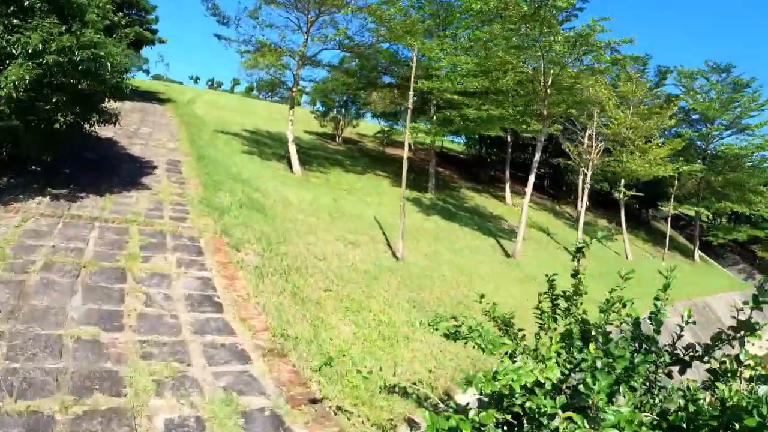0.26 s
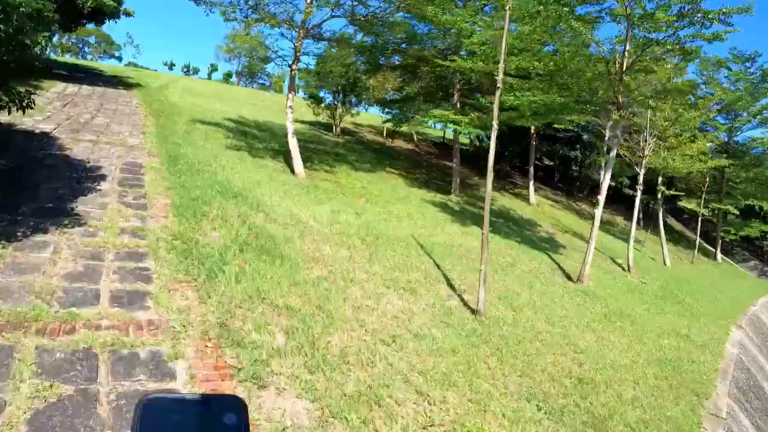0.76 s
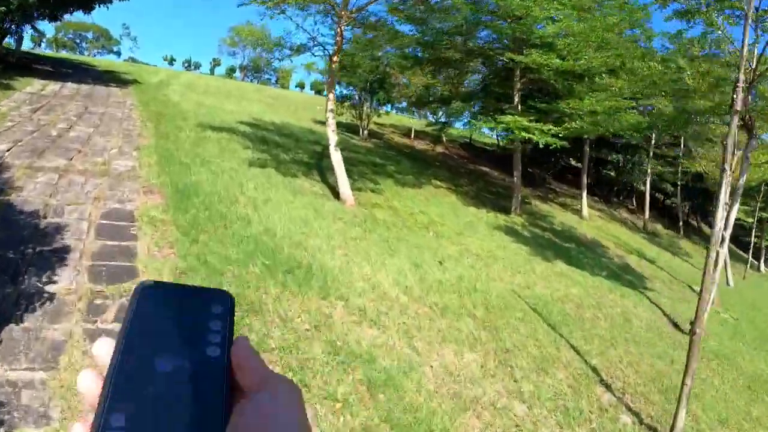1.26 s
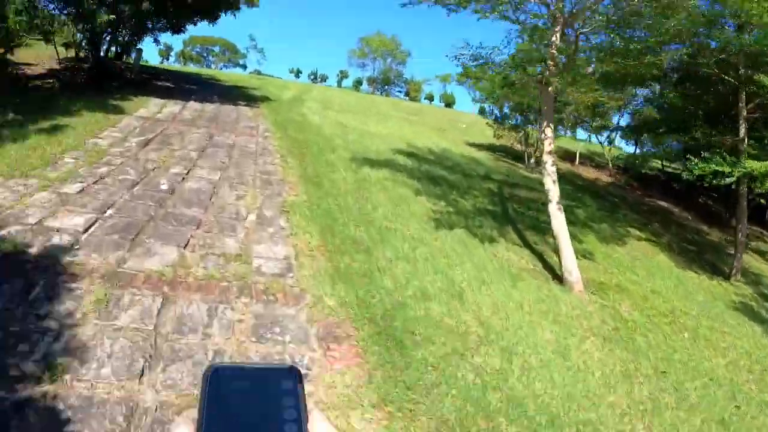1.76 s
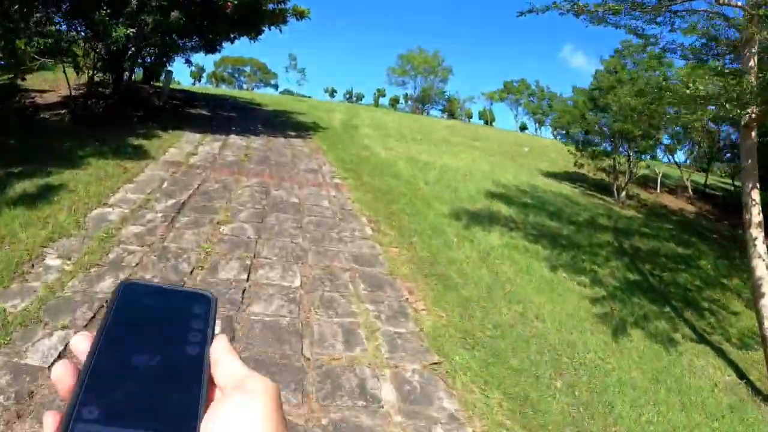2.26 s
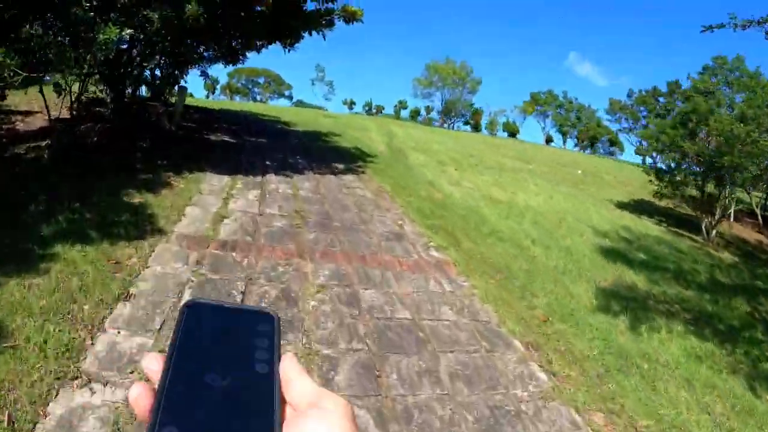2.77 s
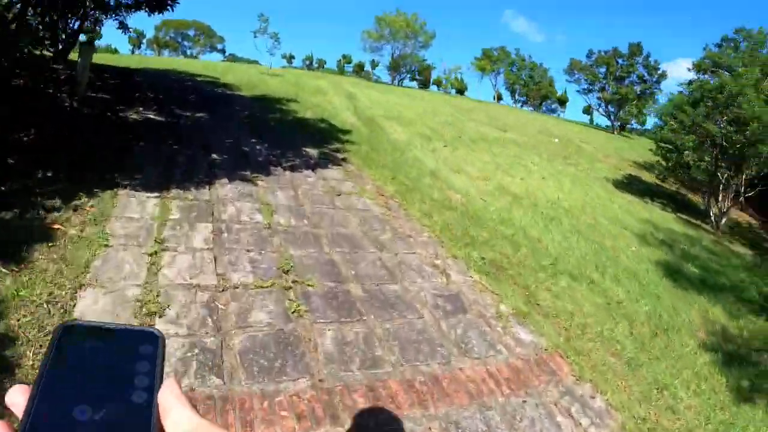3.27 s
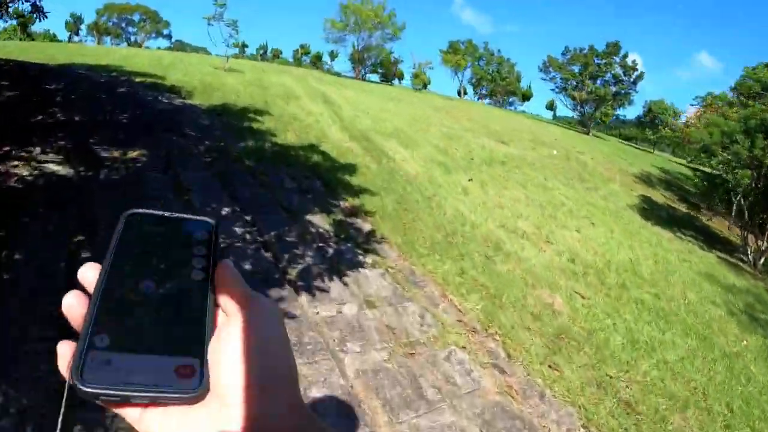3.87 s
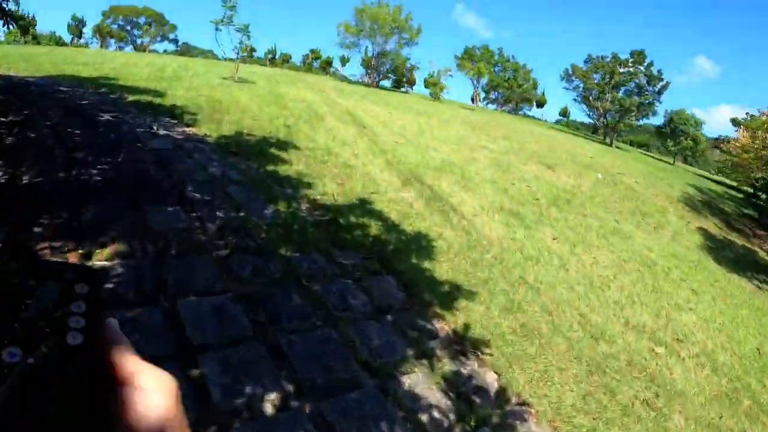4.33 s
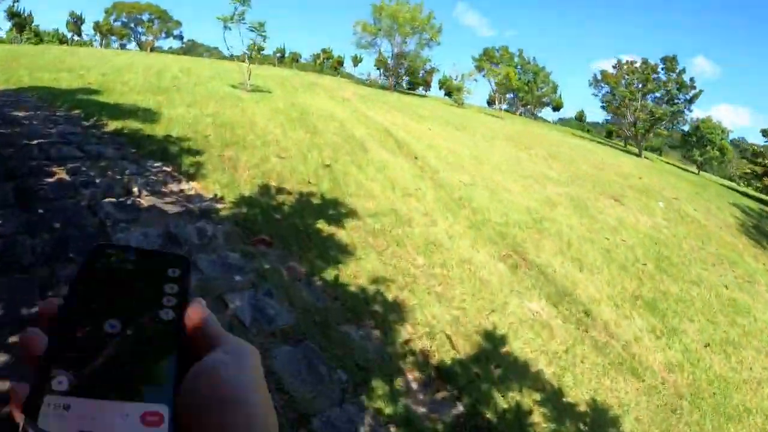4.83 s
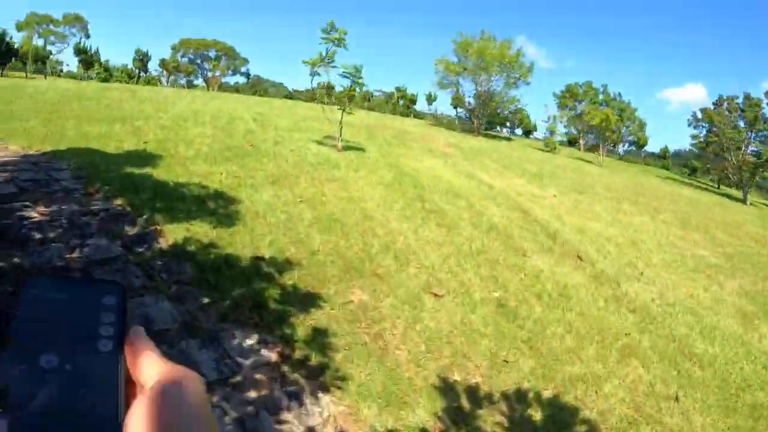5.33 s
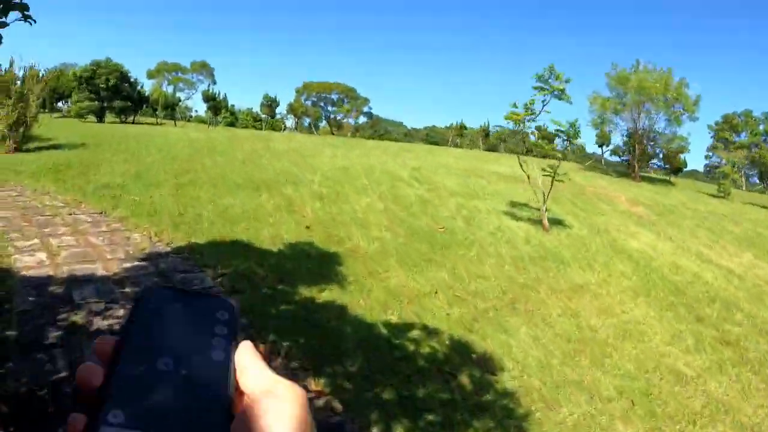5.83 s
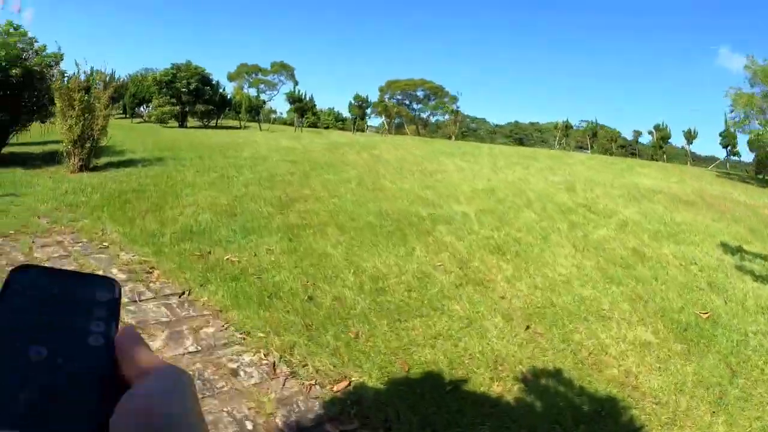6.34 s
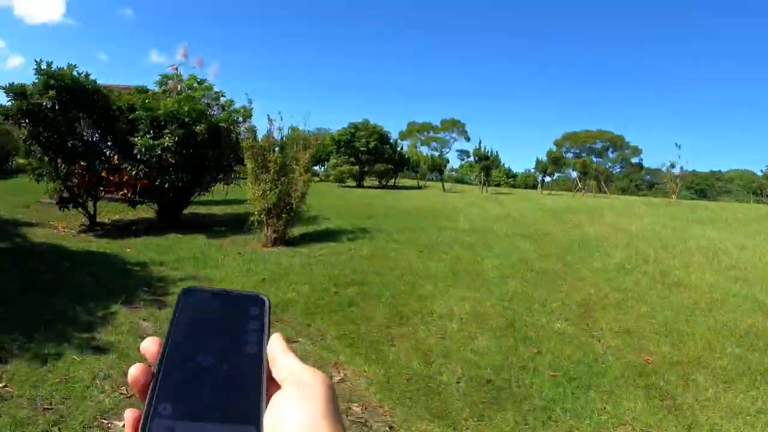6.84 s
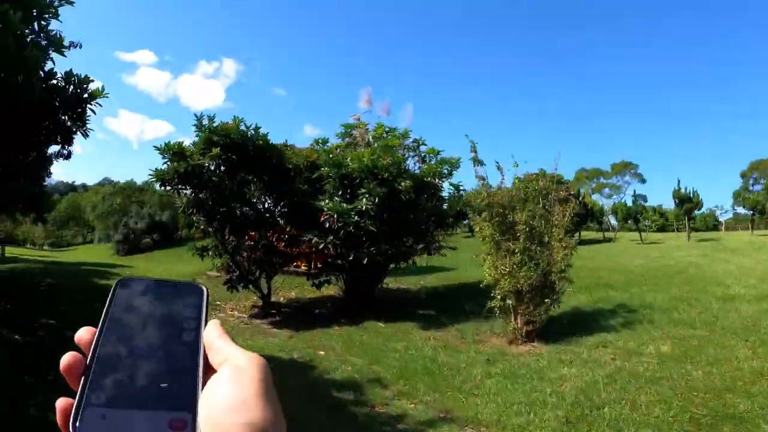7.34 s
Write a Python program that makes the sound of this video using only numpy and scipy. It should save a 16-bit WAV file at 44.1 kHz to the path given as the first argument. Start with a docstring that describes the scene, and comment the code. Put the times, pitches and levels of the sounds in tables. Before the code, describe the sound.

Close handling noise on an outdoor climb: hard plastic knocks, dull bumps, scratchy fabric rubbing and thin grassy crackles, growing strongest near the end.

```python
"""Camera on a grassy climb

A walker climbs a grassy slope with a small camera strapped on. Its plastic shell knocks and bumps in the
mount (struck modes, soft low cycles), cloth rubs past the two microphone ports, mostly the right one
(coloured random clicks), and grass hisses and crunches (finer, brighter clicks).
The camera first sends the left port to both channels, then fades to stereo."""
import sys
import numpy as np
from scipy import signal
from scipy.fft import rfft, irfft
from scipy.io import wavfile

SR = 44100
rng = np.random.default_rng(int(sys.argv[2]) if len(sys.argv) > 2 else 0)


def volts_from_decibels(level):
    """Turn decibel levels (scalar or array-like) into linear amplitude factors."""
    exponent = np.asarray(level, float) / 20
    return 10 ** exponent


def log_audio(samples):
    """Write samples as a 16-bit WAV file to the path given in sys.argv[1]."""
    # one column per channel
    frames = np.atleast_2d(samples).T
    # limit to full scale, then quantise
    limited = np.clip(frames, -1, 1)
    pcm = np.round(limited * 32767).astype(np.int16)
    wavfile.write(sys.argv[1], SR, pcm)


N = 335160    # samples, 7.6 s


def scene():
    """Shell, cloth and grass as they reach the left and right ports."""
    return knocks() + bumps() + cloth() + grass()


# Knocks of the shell, levels before the plastic damps the top. Each row: start in seconds, ring peak in dB
# at the right port, left minus right in dB, clack peak in dB, tick peak in dB.
KNOCKS = [(0.0036, -57, 4.5, -47.5, -35), (0.025, -66, -2, -48, -83), (0.0943, -63, 0, -63, -78),
          (0.157, -54.5, 4, -49, -38.5), (0.1837, -61, 1, -56, -62), (0.257, -52, -5, -37, -59),
          (0.2758, -49, 0.5, -46, -43.5), (0.307, -59, 2, -53, -37), (0.4061, -63, -5, -52, -78),
          (0.4239, -64, -1, -56, -70), (0.4709, -51.5, -2, -44.5, -39.5), (0.5418, -53, 0, -48, -50.5),
          (0.5876, -47.5, -4.5, -44, -47.5), (0.6117, -66, -3, -66, -52), (0.653, -76, -8, -48.5, -52),
          (0.7226, -76, -7, -72, -76), (0.781, -61, -3, -49, -42.5), (0.8203, -71, 0.5, -52, -76),
          (0.9232, -79, 5, -55, -44.5), (0.9498, -74, -4.5, -51, -60), (1.018, -82, -7, -86, -67),
          (1.0868, -55, -1, -52, -54), (1.134, -65, 0, -43, -61), (1.2015, -58, -3, -52.5, -63),
          (1.2653, -81, 0, -62, -61), (1.3558, -53.5, 3, -51, -41), (1.405, -50.5, 1, -46, -56),
          (1.5163, -56, 2, -57, -67), (1.5628, -64, -8, -63, -74), (1.5844, -70, -7, -61, -63),
          (1.717, -57, 3.5, -49, -40), (1.7907, -53.5, 0.5, -58, -67), (1.8449, -70, -5, -56, -48.5),
          (1.8563, -66, -5, -52, -59), (1.8728, -65, 0, -53, -59), (1.954, -52, 0, -59, -65),
          (2.0163, -64.5, 8, -49.5, -69), (2.1147, -60, 0, -59, -75), (2.1778, -33.5, -43, -49, -58),
          (2.2079, -44, -31, -38, -51), (2.2774, -57, 5, -46.5, -70), (2.3534, -18.5, -33, -22.5, -22.5),
          (2.3893, -53, -17, -30, -51), (2.453, -39, -7.5, -38, -53), (2.4729, -10, -40, -14.5, -19.5),
          (2.4952, -26, -45, -50, -66), (2.5258, -40, -19, -35, -50), (2.5516, -19.5, -49, -23.5, -35),
          (2.602, -37.5, 2.5, -34.5, -64), (2.6734, -15, -37, -19.5, -21.5), (2.761, -46, -1, -35, -63),
          (2.7812, -9.5, -39, -12.5, -18.5), (2.8064, -24, -46, -40, -77), (2.8625, -25.5, -41, -59, -62),
          (2.9322, -36.5, 3, -28, -55), (2.9637, -38.5, -27, -42, -60), (2.9968, -47, -25, -46, -60),
          (3.086, -47, 0, -53, -59), (3.1235, -37.5, -0.5, -41, -53), (3.1657, -58, 2, -43, -61),
          (3.1805, -31.5, -28, -29, -43), (3.2337, -35.5, -27, -44, -68), (3.255, -30, -0.5, -35.5, -31.5),
          (3.3263, -37, -5, -31, -40), (3.3959, -39.5, -25, -33, -63), (3.4473, -17.5, -41, -24, -40.5),
          (3.4715, -25, -46, -39, -45), (3.5145, -32, -29, -44, -60), (3.5298, -26, -42, -35, -45),
          (3.561, -39, -34, -43, -63), (3.5797, -38, 2, -43, -52), (3.6766, -46, -3, -56, -37.5),
          (3.7442, -33, 2, -39, -53), (3.8407, -45.5, -13, -33.5, -45), (3.9213, -31, 2.5, -40, -55),
          (3.9932, -17.5, -27, -20, -22), (4.025, -32, -22, -19, -36), (4.0867, -38, -1, -40, -49),
          (4.269, -42.5, 0.5, -43, -57), (4.314, -33, -29, -37, -49), (4.3363, -34, -24, -22.5, -55),
          (4.3652, -35.5, -34, -61, -67), (4.4484, -40.5, 0, -31, -66), (4.472, -58, -17, -27, -60),
          (4.538, -46, -18, -32, -45), (4.624, -33.5, 2.5, -25.5, -34), (4.7125, -59, -8, -38, -47),
          (4.7879, -29.5, 1.5, -36, -55), (4.8087, -58, -6, -33.5, -53), (4.853, -34.5, -26, -26.5, -52),
          (4.873, -59, -4, -34, -41), (4.9049, -27.5, -39, -41, -62), (4.955, -31.5, 2.5, -31.5, -49),
          (4.9666, -53, -0.5, -47, -45), (5.0266, -22, -43, -26.5, -35), (5.0561, -40.5, -30, -37, -54),
          (5.1054, -33.5, -1, -33, -48), (5.1346, -50, -6, -43, -52), (5.176, -27, -28, -38, -60),
          (5.183, -27.5, -32, -43, -61), (5.1999, -38.5, -29, -33, -43.5), (5.2749, -32, 3.5, -38, -47),
          (5.3502, -18, -48, -47, -44), (5.408, -51, -25, -26.5, -62), (5.4368, -33.5, 1, -33.5, -47),
          (5.4643, -33, -33, -28.5, -50), (5.4874, -27, -43, -46, -58), (5.504, -54, -20, -31, -52),
          (5.54, -35.5, -38, -61, -57), (5.6094, -48.5, 3, -51, -74), (5.6288, -54, -8, -43, -41),
          (5.69, -16, -39, -19.5, -20.5), (5.7042, -66, -1, -40, -67), (5.778, -36, 3, -44, -66),
          (5.8069, -24, -38, -30.5, -49), (5.8401, -26, -34, -38, -55), (5.8532, -28.5, -35, -24.5, -55),
          (5.8672, -40, -6, -37, -51), (5.9544, -33, 4, -31, -56), (6.0262, -17, -53, -25.5, -46),
          (6.108, -41, -1, -44, -58), (6.2044, -30, -36, -42, -61), (6.227, -34, -37, -50, -73),
          (6.2743, -38, -10, -35, -62), (6.322, -25.5, -1, -36, -68), (6.327, -33, -0.5, -38, -48),
          (6.3528, -22.5, -37, -39, -63), (6.3971, -37.5, -24, -42, -59), (6.4405, -55, 0, -40, -56),
          (6.4652, -10, -39, -13, -19), (6.5025, -26, -39, -48, -64), (6.5175, -31, -31, -47, -62),
          (6.5315, -38.5, -19, -30, -48), (6.683, -16, -51, -24.5, -37), (6.734, -32, -24, -45, -62),
          (6.7917, -34.5, -17, -37, -61), (6.8365, -18.5, -30, -23, -31), (6.8617, -27, -30, -37, -52),
          (6.9752, -46, -6, -37, -55), (6.9897, -34.5, -19, -37, -48), (7.0169, -14.5, -44, -21, -35.5),
          (7.0373, -39, -2, -36, -51), (7.101, -54, -1, -41, -49), (7.1262, -11, -26, -11.5, -15.5),
          (7.1605, -19, -47, -30, -39), (7.2045, -21, -43, -50, -45), (7.2673, -24, -16, -34, -47),
          (7.2758, -10.5, -38, -19, -27.5), (7.328, -11, -40, -13.5, -16.5), (7.3412, -35, -30, -34, -69),
          (7.43, -50, -2, -39, -37), (7.442, -8, -35, -15, -18), (7.449, -24, -38, -43, -47),
          (7.476, -17, -41, -38, -38.5), (7.5284, -39.5, -30, -56, -67), (7.5604, -30.5, -20, -24.5, -43),
          (7.5958, -35, -21, -22.5, -43)]
# Modes of the struck shell, in three groups: ring, clack and tick, before each strike's scatter.
# Each row: frequency in Hz, strength in dB, decay by 60 dB in seconds.
RING_MODES = [(696, -6.5, 0.014), (797.4, -8.5, 0.017), (921, -0.5, 0.013), (1074, -4.5, 0.011),
              (1290, 8.5, 0.0057), (1622, 10.5, 0.0068), (1805, -7, 0.0097)]
CLACK_MODES = [(2180, 13.5, 0.0025), (2593, -3.5, 0.02), (3200, -1.5, 0.0044), (3745, -4.5, 0.0051)]
TICK_MODES = [(4280, -17.5, 0.018), (5050, -1, 0.012), (5456, 1, 0.016), (6260, 4, 0.0095),
              (6820, 2.5, 0.0063), (6800, -26, 0.0011), (8620, -2, 0.0066), (9710, 0, 0.0075)]


def knocks():
    """Struck shell modes; the left port hears less of a right-side knock, the treble least weakened."""
    jolt_hz, side_knock_hz, rise_hz_per_db = 1140, 1098, 8.5
    pitch_scatter_octaves, side_full_db, shell_cut_hz = 0.18, -8.5, 7250
    left_lead_s = 0.00023    # most that a right-side knock leads at the left port, through the shell
    s, ring_db, side_db, clack_db, tick_db = np.transpose(KNOCKS)[:, :, None]
    on_side = np.clip(side_db / side_full_db, 0, 1)    # 0 is a jolt in the mount, 1 a right-side knock
    # a jolt favours higher modes; a side knock rings lower, rising with its strength
    side_hz = side_knock_hz + rise_hz_per_db * ring_db
    spot_hz = (1 - on_side) * jolt_hz + on_side * side_hz
    scatter = pitch_scatter_octaves * (1 - 0.69 * on_side)    # jolts scatter most
    spot_hz = spot_hz * 2 ** (scatter * rng.standard_normal(spot_hz.shape))
    favour_db = (10.5 + 13.5 * on_side)[..., None, None]

    ring = volts_from_decibels(ring_db) * struck(RING_MODES, spot_hz, 0.001582, 0.0049, favour_db)
    clack = volts_from_decibels(clack_db) * struck(CLACK_MODES, spot_hz, 0.002643, 0.00026)
    tick = volts_from_decibels(tick_db) * struck(TICK_MODES, spot_hz, 0.0027, 0.00009)
    right = ring + clack + tick
    left = ring * volts_from_decibels(side_db) + clack * volts_from_decibels(0.4 * side_db) + tick * volts_from_decibels(0.25 * side_db)

    lead = left_lead_s * np.clip(-side_db / 3.1, 0, 1)
    out = np.zeros((2, N + 2400))
    for k in range(len(KNOCKS)):
        early = int(max(s[k, 0] - lead[k, 0], 0) * SR)
        late = int(s[k, 0] * SR)
        out[0, early:early + 2400] += left[k]
        out[1, late:late + 2400] += right[k]
    damping = signal.butter(4, shell_cut_hz, fs=SR, output="sos")    # plastic damps the top
    return signal.sosfilt(damping, out[:, :N])


def struck(modes, spot_hz, contact_s, rise_s, favour_db=0):
    """Per knock, every mode is struck twice within the contact, with its own strength; peak 1."""
    hz, db, t60 = np.transpose(modes)[:, None, :, None, None]
    chance = rng.random((len(spot_hz), len(modes), 2, 3))
    delay = contact_s * chance[..., :1] ** 2
    t = np.maximum(np.arange(2400) / SR - delay, 0)
    octaves_off = np.abs(np.log2(hz / spot_hz[..., None, None]))    # from the struck spot's pitch
    strength = volts_from_decibels(db + 14.0 * (chance[..., 1:2] - 0.5) - favour_db * octaves_off)
    detune = 1 + 0.049 * (chance[..., 2:] - 0.5)    # the grip shifts the modes a little
    envelope = volts_from_decibels(-60 * t / t60) * (1 - np.exp(-t / rise_s))
    rings = strength * np.sin(2 * np.pi * hz * detune * t) * envelope
    rings = rings.sum(axis=(1, 2))
    return rings / np.abs(rings).max(axis=1, keepdims=True)


# Dull bumps of the body against the mount. Each row: middle in seconds, nominal length in ms,
# main pitch in Hz, nominal right level in dB, nominal left level in dB.
BUMPS = [(0.006, 4.9, 270, -53, -46.5), (0.051, 21, 294, -49, -49), (0.139, 40, 322, -51, -51),
         (0.158, 12.7, 387, -40, -38.5), (0.276, 16.4, 456, -54, -50.5), (0.433, 21, 395, -54, -56.5),
         (0.446, 24.4, 484, -55, -61), (1.203, 30, 403, -48, -48.5), (1.344, 6.3, 480, -56, -51),
         (1.393, 39, 257, -52, -47), (1.526, 18, 310, -53, -50.5), (1.568, 10.7, 369, -35, -39.5),
         (1.756, 11, 272, -42, -43.5), (2.333, 20, 500, -50, -72), (2.39, 21, 279, -53, -76),
         (2.459, 17, 360, -60, -49), (2.705, 11.7, 383, -50.5, -78), (2.97, 16.2, 510, -42, -71),
         (3.279, 19, 474, -44.5, -53), (3.337, 18.7, 374, -41, -55), (3.372, 12.3, 390, -48, -67),
         (3.506, 16, 487, -41.5, -62), (3.587, 8.5, 417, -37.5, -42), (3.931, 38, 447, -56, -54),
         (3.94, 20, 363, -44, -73), (3.997, 5.1, 434, -30, -44), (4.033, 10.5, 510, -37, -55),
         (4.094, 33, 433, -51, -62), (4.187, 20, 473, -50, -71), (4.276, 8.8, 404, -40, -44),
         (4.305, 17, 480, -47, -73), (4.339, 11, 364, -53, -58), (4.474, 9.1, 420, -52, -71),
         (4.626, 9.2, 410, -35, -31.5), (4.794, 22, 515, -43, -46.5), (4.863, 19, 357, -47.5, -69),
         (4.961, 13, 385, -49.5, -54), (5.183, 17.5, 457, -47, -72), (5.285, 16.4, 496, -46, -47.5),
         (5.441, 12.3, 420, -35.5, -41), (5.465, 17.7, 332, -46.5, -68), (5.509, 12, 440, -59, -68),
         (5.782, 20, 315, -46, -49), (5.81, 20.4, 327, -44, -56), (5.857, 21, 325, -47, -75),
         (5.957, 9.7, 494, -38.5, -41.5), (6.121, 31, 336, -50, -76), (6.479, 22, 460, -71, -50),
         (6.801, 27, 422, -47, -67), (6.854, 13.4, 397, -43, -75), (7.018, 16.8, 385, -32, -70),
         (7.132, 25, 368, -33.5, -61), (7.139, 10.4, 486, -31, -65), (7.152, 13.3, 308, -35.5, -76),
         (7.192, 21, 437, -29.5, -73), (7.211, 20, 396, -31.5, -76), (7.331, 33.4, 358, -33.5, -69),
         (7.343, 17.7, 400, -29.5, -70), (7.457, 26.4, 303, -25.5, -63), (7.479, 33, 363, -31, -77)]


def bumps():
    """A few soft cycles of a low tone and two unrelated partials that swell and stop."""
    out = np.zeros((2, N + 4000))
    t = np.arange(4000) / SR
    for (s, ms, hz, right_db, left_db), chance in zip(BUMPS, rng.random((len(BUMPS), 4))):
        u = t / (0.27 * ms / 1000)    # the swell is fullest at u = 1
        swell = u * np.exp((1 - u ** 2) / 2)
        phase = 2 * np.pi * hz * t
        wave = np.sin(phase + 2 * np.pi * chance[0])
        wave += 0.67 * np.sin((1.191 + 0.486 * chance[2]) * phase + 2 * np.pi * chance[1])
        wave += 1.07 * np.sin((0.558 + 0.47 * chance[3]) * phase)
        at = max(int((s - 0.4586 * ms / 1000) * SR), 0)
        out[:, at:at + 4000] += volts_from_decibels(np.array([[left_db], [right_db]])) * wave * swell
    return out[:, :N]


# Steady rubbing at the right port, before it wavers. Each row: time in seconds, cloth contact as rasp
# level in dB, shaking of the mount as rumble level in dB.
RUBBING = [(0, -65.5, -68), (0.3, -70, -79), (0.8, -71, -79), (1.4, -69.5, -79), (2.1, -73, -77),
           (2.3, -62, -68.5), (2.8, -60.5, -67.5), (3.3, -58.5, -57), (3.7, -56, -61), (4.2, -58.5, -65),
           (4.7, -58.5, -63), (5.3, -58, -60.5), (5.8, -59.5, -68), (6.3, -58, -62.5), (6.7, -56.5, -62.5),
           (7.05, -57, -63.5), (7.25, -52.5, -47), (7.6, -54, -54.5)]
# Cloth strokes, before the weave catches. Each row: middle in seconds, nominal length in ms,
# rasp level in dB at the right port, sizzle minus rasp in dB.
STROKES = [(0.03, 13, -70, -21), (0.093, 19, -65, -4), (0.174, 26, -58, -22), (0.19, 11, -60, -3),
           (0.259, 31, -41.5, -14), (0.309, 30, -61, -6), (0.426, 45, -55, -12), (0.48, 26, -53.5, -17),
           (0.545, 19, -57, -13), (0.613, 78, -57, -14), (0.64, 33, -61, 2), (0.735, 25, -69, -10),
           (0.801, 64, -53.5, -18), (0.877, 53, -58.5, -15), (0.94, 56, -56.5, -6), (1.093, 21, -47.5, -21),
           (1.114, 57, -51.5, -12), (1.21, 20, -54, -15), (1.241, 34, -52, -10), (1.36, 38, -62, -7),
           (1.412, 36, -50.5, -8), (1.53, 17, -54, -19), (1.575, 36, -56, -1), (1.647, 9.8, -54, -14),
           (1.724, 33, -51.5, -29), (1.814, 49, -62.5, -9), (1.867, 37, -51.5, -7), (1.952, 45, -62, -8),
           (2.02, 38, -48.5, -13), (2.15, 9.8, -56, -12), (2.199, 53, -57.5, -6), (2.257, 15, -67, -22),
           (2.357, 58, -41, -14), (2.473, 80, -49.5, -16), (2.527, 46, -50.5, -15), (2.62, 92, -59.5, -26),
           (2.665, 43, -51, -17), (2.714, 31, -54, -18), (2.778, 66, -53.5, -16), (2.843, 35, -48, -19),
           (2.935, 31, -42, -23), (2.984, 51, -50, -15), (3.035, 55, -58, -3), (3.09, 28, -57, 1),
           (3.139, 130, -47.5, -15), (3.174, 17, -42.5, -8), (3.259, 134, -52.5, -22),
           (3.327, 41, -34.5, -7.5), (3.379, 26, -52, -37), (3.456, 78, -52, -11), (3.503, 56, -41, -17),
           (3.567, 87, -54, -17), (3.652, 67, -50.5, -9.5), (3.745, 46, -47.5, -9), (3.816, 92, -48, -12),
           (3.93, 31, -57, -5), (4.005, 63.6, -34, -9.5), (4.128, 77, -54, -5.5), (4.189, 54, -47.5, -8),
           (4.271, 72, -49.5, -21), (4.332, 44, -39, -22), (4.458, 18, -49, -14), (4.519, 126, -50.5, -8.5),
           (4.623, 73, -52.5, -2.5), (4.708, 72, -44, -11.5), (4.823, 136, -50.5, -11.5),
           (4.863, 30, -43.5, -8), (4.939, 110, -55.5, -28), (5.047, 85, -48.5, -7),
           (5.134, 170, -56.5, -22), (5.187, 21, -42.5, -18), (5.342, 68, -45.5, -13),
           (5.431, 51, -53, -10), (5.474, 93, -54, -8.5), (5.5, 18, -43, -11.5), (5.644, 48, -56, -7),
           (5.688, 140, -59, -11), (5.802, 103, -53, -12), (5.858, 47, -44.5, -12), (5.925, 26, -54, -29),
           (5.976, 42, -47, -20), (6.017, 50, -44, -14), (6.121, 42, -50.5, -26), (6.192, 65, -43.5, -11),
           (6.271, 87, -53, -33), (6.34, 30, -51, -1.5), (6.393, 37, -54.5, -11), (6.465, 61, -46.5, -10.5),
           (6.52, 84, -53, -11), (6.677, 37, -47.5, -5.5), (6.753, 97, -51.5, -10), (6.8, 67, -50, -16),
           (6.85, 45, -48.5, -23), (6.995, 88, -47, -11), (7.13, 23, -46, 1), (7.214, 50, -59.5, 0.5),
           (7.277, 6.9, -38.5, 2.5), (7.334, 19, -47, -18), (7.452, 100, -46.5, -14),
           (7.572, 47, -48.5, -8.5)]


def cloth():
    """Rubbing and strokes share the same fibres; slow contact shakes the shell and makes it hum."""
    contact_db, shake_db = in_time(RUBBING)
    rows = [(s, ms, db, db + rel_db) for s, ms, db, rel_db in STROKES]
    stroke, bright = swells(rows, stretch=0.65, edge=0.88)
    catch = volts_from_decibels(2.81 * drift(37))    # the weave catches and slips
    out = rasp(contact_db, stroke, catch) + sizzle(contact_db, bright, catch)
    out += rumble(contact_db, shake_db, stroke)
    out[1] += hum(shake_db, stroke)
    return out


# Colour of the rasp at each port. Each row: frequency in Hz, relative level in dB.
RASP_LEFT = [(800, -18.5), (1170, -16.5), (1800, -3.5), (2170, -6.5), (2560, 2), (2820, -12.5), (3190, -3),
             (3800, -11.5), (6000, -38)]
RASP_RIGHT = [(800, -13), (1400, -16.5), (1750, -2.5), (2250, -3.5), (2540, 5), (2720, -8), (2870, 3.5),
              (3100, -5), (3500, -7), (4100, -21.5), (6000, -43.5)]


def rasp(contact_db, stroke, catch):
    """Coarse fibres letting go, in three bands that swell and thin on their own."""
    splits_hz, patchy_db = (1500, 2830), 2.5
    left_db, left_steady_db, waver_db = -13.5, -1, 2.5    # steady rubbing is fainter still on the left
    steady_db = contact_db + np.array([[left_steady_db], [0]]) + waver_db * drift(10)
    gain = np.sqrt(volts_from_decibels(2 * steady_db) + stroke) * volts_from_decibels(np.array([[left_db], [0]])) * catch
    coarse = grains(2500, 2.9, 0.35)
    whole = np.array([coloured(coarse[0], RASP_LEFT), coloured(coarse[1], RASP_RIGHT)])
    below = [signal.sosfiltfilt(signal.butter(2, hz, fs=SR, output="sos"), whole) for hz in splits_hz]
    bands = (below[0], below[1] - below[0], whole - below[1])
    return gain * sum(band * volts_from_decibels(patchy_db * drift(21.6)) for band in bands)


# Colour of the sizzle at each port, then of the thin hiss. Each row: frequency in Hz, relative level in dB.
SIZZLE_LEFT = [(3000, -19), (3800, -2), (5000, -16), (6500, -8.5), (8500, -14.5), (10500, -44),
               (12000, -25)]
SIZZLE_RIGHT = [(3000, -2), (3700, -2), (4400, 5), (5000, 1.5), (5640, -2.5), (6280, -16.5), (6900, -15),
                (8200, -23), (10000, -48)]
THIN = [(4600, -30), (5300, -2), (5650, 0), (6000, -6), (6600, -28)]
# A thin hiss near the top of the sizzle, on the right, before the weave catches.
# Each row: middle in seconds, nominal length in ms, level in dB.
THIN_HISSES = [(5.03, 136, -64), (5.16, 37, -67)]


def sizzle(contact_db, bright, catch):
    """Fine fibres letting go give a flickering treble, with a thin hiss on the right."""
    left_db, steady_db = -15, -13.0    # relative to the right sizzle, to the contact
    gain = np.sqrt(volts_from_decibels(2 * (contact_db + steady_db)) + bright) * volts_from_decibels(np.array([[left_db], [0]]))
    gain = gain * catch * volts_from_decibels(6.6 * drift(20))
    fine = grains(5000, 3.3, 0.63)
    out = gain * np.array([coloured(fine[0], SIZZLE_LEFT), coloured(fine[1], SIZZLE_RIGHT)])
    thin_gain = np.sqrt(swells(THIN_HISSES, stretch=0.64, edge=0.49)[0]) * catch[1]
    out[1] += thin_gain * coloured(fine[1], THIN)
    return out


# Colour of the rumble. Each row: frequency in Hz, relative level in dB.
RUMBLE = [(130, 5), (200, -8.5), (330, -1.5), (520, -4), (800, -12.5), (1400, -21.5), (2000, -30)]


def rumble(contact_db, shake_db, stroke):
    """The shaken mount grumbles as sparse, low-coloured clicks."""
    left_db, left_follows = -67.5, 0.56    # left level at a contact of -60 dB, share of the contact's swing
    stroke_db = -16    # relative to the stroke's right rasp
    left_power = volts_from_decibels(2 * (left_db + left_follows * (contact_db + 60)))
    right_power = volts_from_decibels(2 * shake_db) + stroke * volts_from_decibels(2 * stroke_db)
    gain = np.sqrt([left_power, right_power]) * volts_from_decibels(2.7 * drift(45))
    return gain * coloured(grains(900, 4.2, 0.44), RUMBLE)


def hum(shake_db, stroke):
    """Sparse clicks excite one broad shell resonance, heard on the right."""
    hum_hz, width_hz = 826, 130
    steady_db, stroke_db = -1.5, -12.5    # relative to the shaking, to the stroke's right rasp
    r = np.exp(-np.pi * width_hz / SR)
    poles = [1, -2 * r * np.cos(2 * np.pi * hum_hz / SR), r * r]
    tone = signal.lfilter([1, 0, -1], poles, grains(400, 4.6, 0)[1])
    tone = rms_one(signal.lfilter([0.1], [1, -0.9], tone))    # softens the clicks
    gain = np.sqrt(volts_from_decibels(2 * (shake_db + steady_db)) + stroke * volts_from_decibels(2 * stroke_db))
    return gain * volts_from_decibels(6.9 * drift(8.2)[1]) * tone


# Crunches of dry blades. Each row: middle in seconds, nominal length in ms, stalk level in dB,
# blade level in dB.
CRUNCHES = [(0.038, 12, -96, -73), (0.309, 9.2, -81, -90), (0.588, 13, -94, -85), (0.657, 18, -80, -78),
            (0.808, 13, -81, -79), (0.958, 13, -80, -93), (1.432, 16, -80, -83), (1.503, 11, -93, -78),
            (1.588, 13, -69.5, -94), (1.645, 13, -91, -76), (1.884, 13, -73, -80), (2.217, 13, -72, -71),
            (2.378, 19, -68, -78), (2.458, 15, -63, -66), (2.623, 21, -83, -78), (2.784, 13, -46, -76),
            (2.936, 19, -56, -57), (3.08, 48, -80, -74), (3.127, 12, -82, -78), (3.264, 15, -59, -66),
            (3.448, 66, -87, -72), (3.681, 15, -74, -53), (3.746, 21, -62, -63), (3.85, 25, -63, -83),
            (3.926, 12, -76, -81), (4.011, 33, -70, -72), (4.195, 14, -58.5, -81), (4.469, 36, -92, -65),
            (4.557, 15, -63, -63), (4.625, 25, -61, -62), (4.716, 18, -72, -72), (4.88, 13, -58, -68),
            (5.048, 15, -85, -74), (5.635, 27, -84, -72), (5.693, 9, -76, -79), (5.79, 28, -90, -82),
            (6.214, 13, -71, -71), (6.28, 9, -82, -68), (6.33, 7.9, -83, -79), (6.467, 16, -51, -61),
            (6.651, 20, -86, -64), (6.87, 12, -88, -71), (7.105, 8, -64, -61), (7.129, 11, -41.5, -63),
            (7.271, 14, -69, -53), (7.331, 9, -69, -79), (7.446, 23, -58, -61), (7.562, 20, -60, -50)]
# Feet sweep through the blades, before the hiss flickers. Each row: middle in seconds,
# nominal length in ms, level in dB.
SWISHES = [(1.69, 130, -90), (2.63, 80, -80), (3.1, 130, -81), (3.49, 54, -80), (3.67, 81, -65),
           (4.27, 150, -77), (4.55, 97, -68.5), (5.05, 100, -83), (6.31, 50, -87), (6.74, 75, -82),
           (6.93, 23, -68), (7.42, 85, -68), (7.58, 40, -70)]
# Colours of blades and stalks. Each row: frequency in Hz, relative level in dB.
BLADES = [(6000, -22), (9000, -13), (11000, -13), (12500, -12), (15000, -14.5), (16000, -22)]
STALKS = [(4000, -34), (6500, -4), (8500, -4), (10000, -13), (11500, -29)]


def grass():
    """Fine dry hiss, sweeps and short crunches that both ports hear much alike."""
    hiss_db = -29    # relative to the cloth contact
    stalk, blade = swells(CRUNCHES, stretch=0.49, edge=0.98)
    sweep, = swells(SWISHES, stretch=0.88, edge=1.0)
    snaps = grains(8200, 4.0, 0.54)
    steady = volts_from_decibels(2 * (in_time(RUBBING)[0] + hiss_db))
    hiss = np.sqrt((steady + sweep) * volts_from_decibels(8.3 * drift(30)[0]) + blade)
    return hiss * coloured(snaps, BLADES) + np.sqrt(stalk) * coloured(snaps, STALKS)


def grains(per_s, spread_db, alike):
    """Fibres let go at random, a few hard; a share of the power reaches both ports, left two samples first."""
    sizes = volts_from_decibels(spread_db * np.minimum(rng.exponential(1, (3, N)), 5)) * rng.choice([-1, 1], (3, N))
    clicks = rms_one(sizes * (rng.random((3, N)) < per_s / SR))
    shared = np.array([clicks[2], np.roll(clicks[2], 2)])
    return np.sqrt(1 - alike) * clicks[:2] + np.sqrt(alike) * shared


def swells(rows, stretch, edge):
    """Power of each dB column: every row swells, holds and fades; half-width is stretch times its length."""
    power = np.zeros((len(rows[0]) - 2, N))
    for s, ms, *db in rows:
        half = int(stretch * ms * SR / 1000)
        at = np.clip(int(s * SR) + np.arange(-half, half), 0, N - 1)
        power[:, at] += volts_from_decibels(2 * np.array(db))[:, None] * signal.windows.tukey(2 * half, edge) ** 2
    return power


def drift(rate_hz):
    """Slow chance for each port, spread 1: noise through two equal poles at the rate, every 20 samples."""
    r = np.exp(-40 * np.pi * rate_hz / SR)
    noise = rng.standard_normal((2, N // 20 + 4002))
    slow = rms_one(signal.lfilter([1], [1, -2 * r, r * r], noise)[:, 4000:])
    return np.array([np.interp(np.arange(N) / 20, np.arange(len(s)), s) for s in slow])


def in_time(rows):
    """Draws each column as straight lines between the row times."""
    s, *columns = np.transpose(rows)
    return [np.interp(np.arange(N) / SR, s, c) for c in columns]


def coloured(x, points):
    """Shapes a signal by a spectrum; rms 1."""
    hz, db = np.transpose(points)
    bins_hz = np.maximum(np.arange(N // 2 + 1) * SR / N, 1)
    gain_db = np.interp(np.log(bins_hz), np.log(hz), db, left=-90, right=-90)
    return rms_one(irfft(rfft(x) * volts_from_decibels(gain_db), N))


def rms_one(x):
    """Scales each signal to an rms of 1."""
    return x / np.sqrt(np.mean(x ** 2, axis=-1, keepdims=True) + 1e-20)


# Colour of the input hiss. Each row: frequency in Hz, relative level in dB.
HISS = [(30, -2), (130, -6), (220, 10.5), (1000, -18), (5000, -20), (16000, -24.5)]


def band_limit(x):
    """A steep low-pass at the top of the band."""
    return signal.sosfilt(signal.butter(12, 16480, fs=SR, output="sos"), x)


def record(dry):
    """Low cut against wind, rounded peaks, hiss of the input stage, fade from left port to stereo."""
    low_cut_hz, ceiling, lopsided, hiss_db = 287, 0.41, 3.8, -81.5
    stereo_from_s, switch_s = 2.15, 0.084
    cut = signal.sosfilt(signal.butter(4, low_cut_hz, "high", fs=SR, output="sos"), dry)
    ports = cut / (1 + (cut / ceiling) ** 4) ** 0.25
    # the input stage bends unevenly near its top: loud knocks leave a deep thump under the cut
    ports = ports + lopsided * ports ** 4
    ports = ports + volts_from_decibels(hiss_db) * coloured(rng.standard_normal((2, N)), HISS)
    stereo = np.clip((np.arange(N) / SR - stereo_from_s) / switch_s, 0, 1)
    right = ports[0] + stereo * (ports[1] - ports[0])
    return band_limit(np.array([ports[0], right]))


dry = scene()
out = record(dry)
log_audio(out)
```